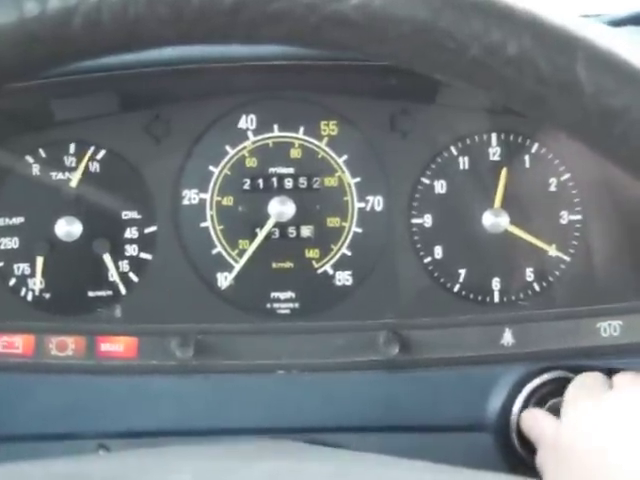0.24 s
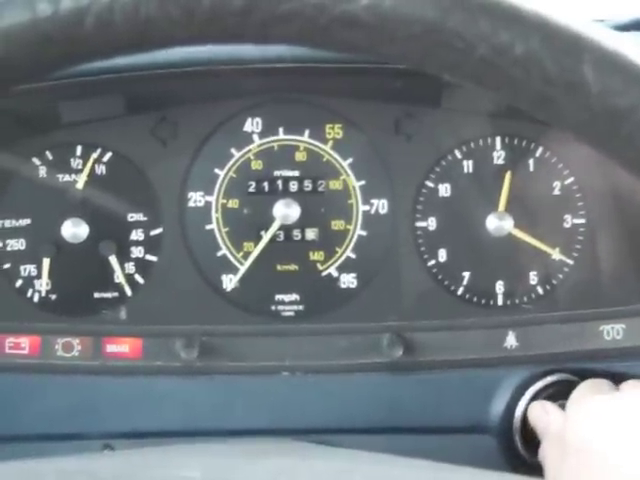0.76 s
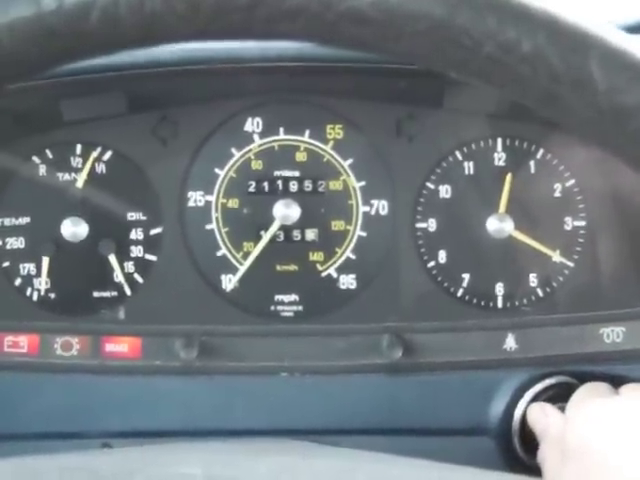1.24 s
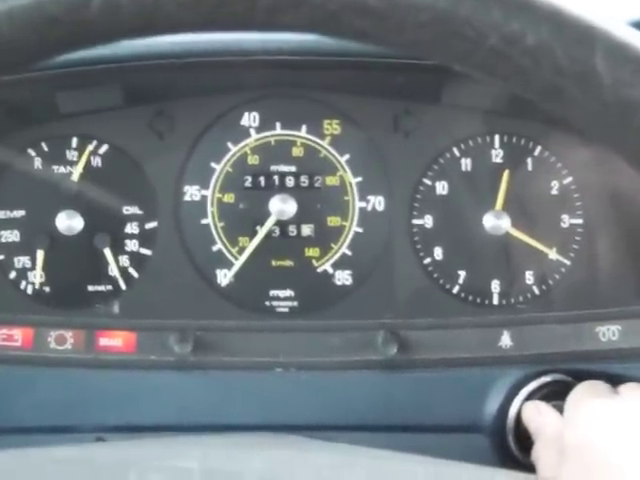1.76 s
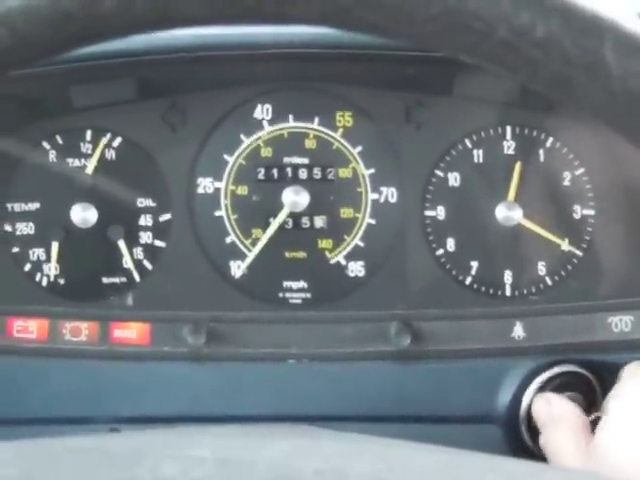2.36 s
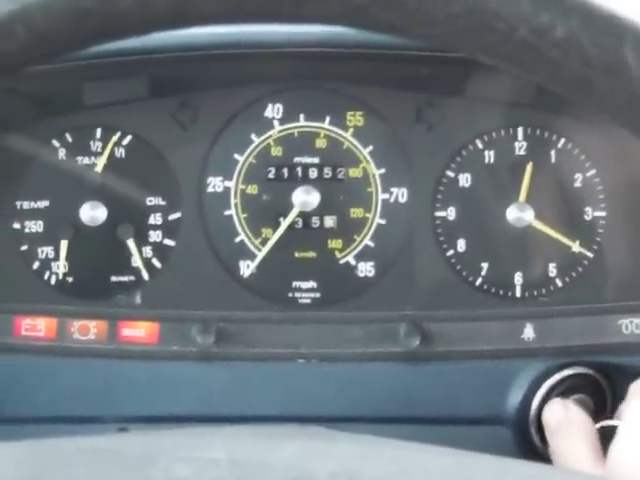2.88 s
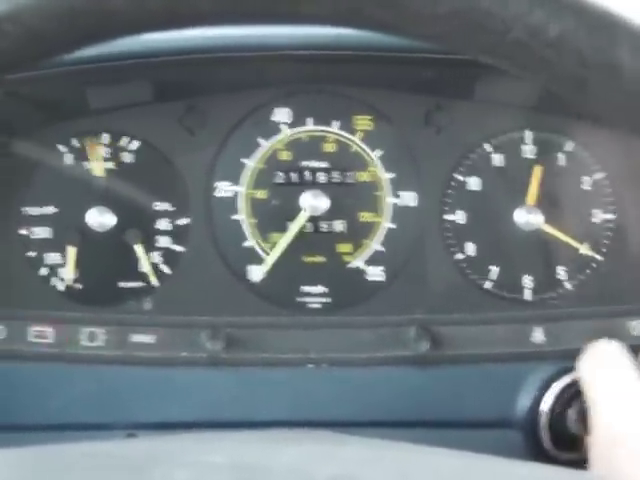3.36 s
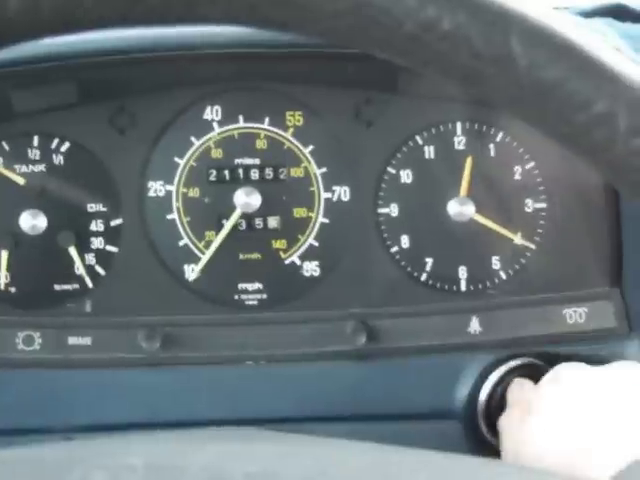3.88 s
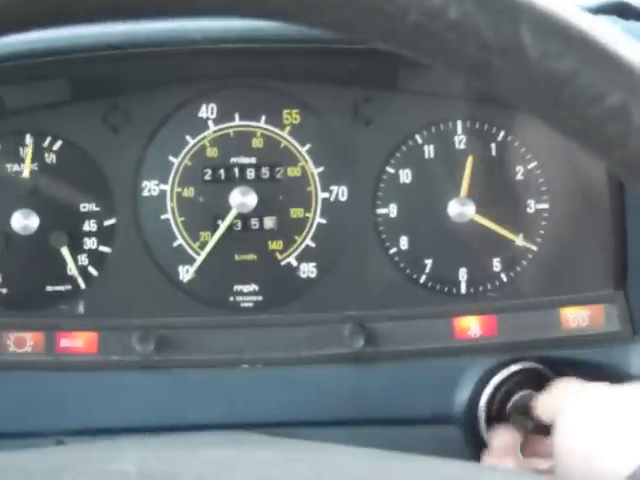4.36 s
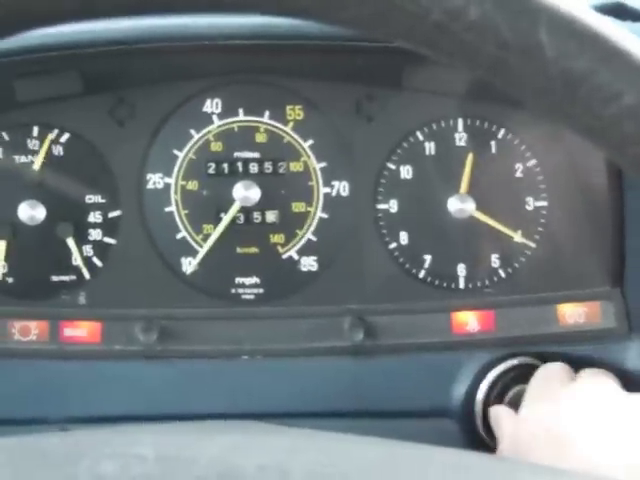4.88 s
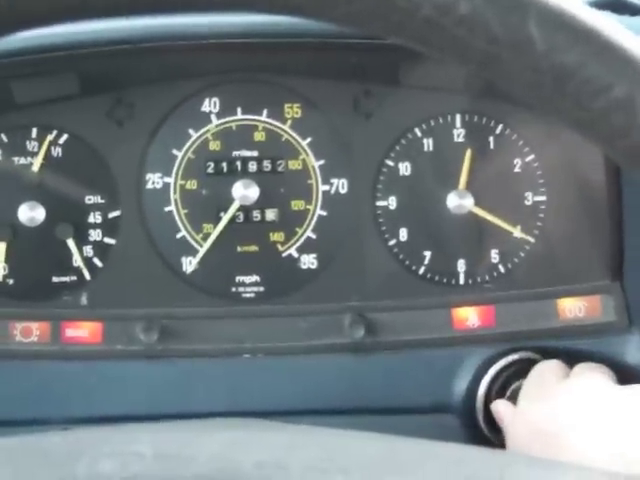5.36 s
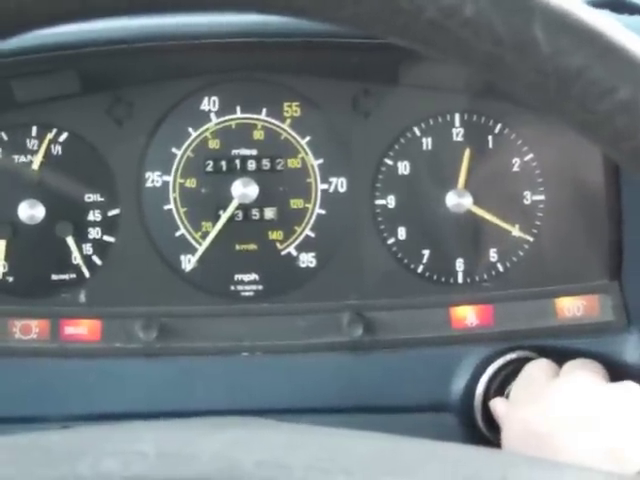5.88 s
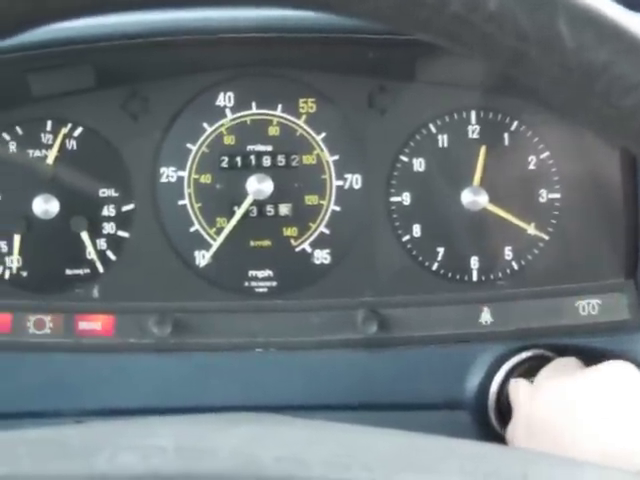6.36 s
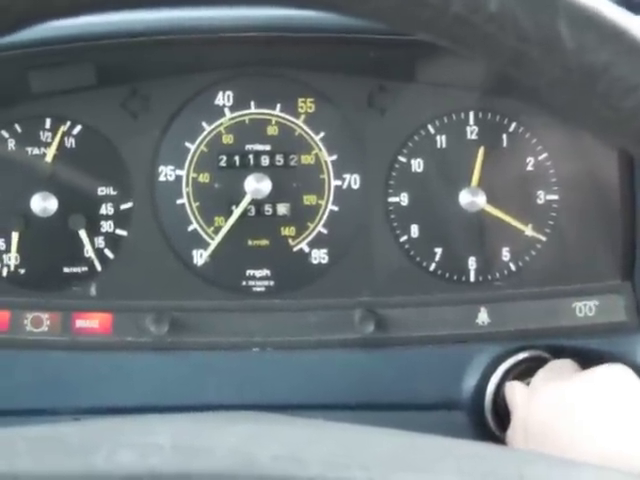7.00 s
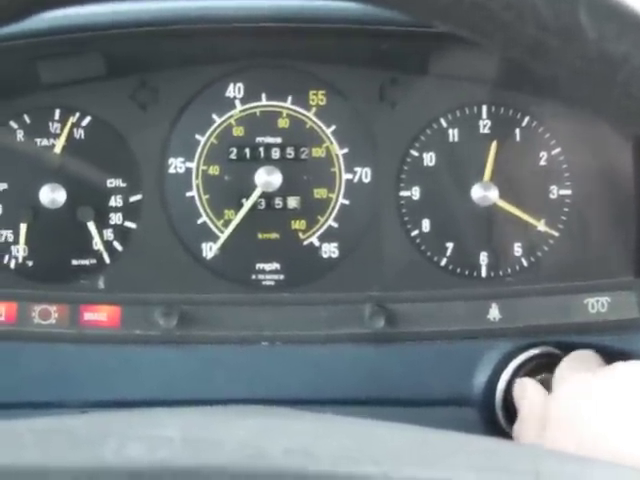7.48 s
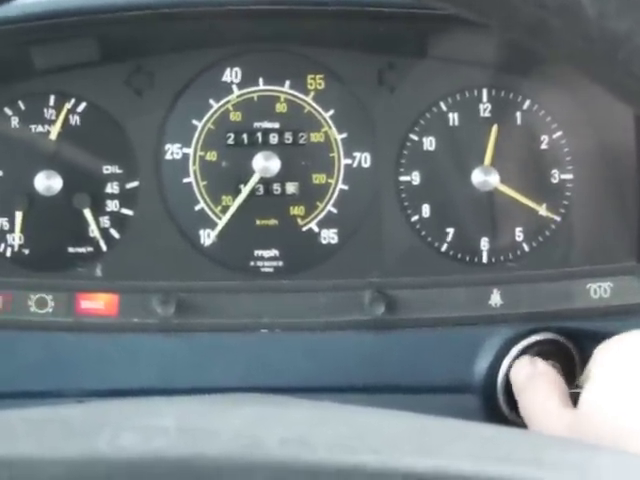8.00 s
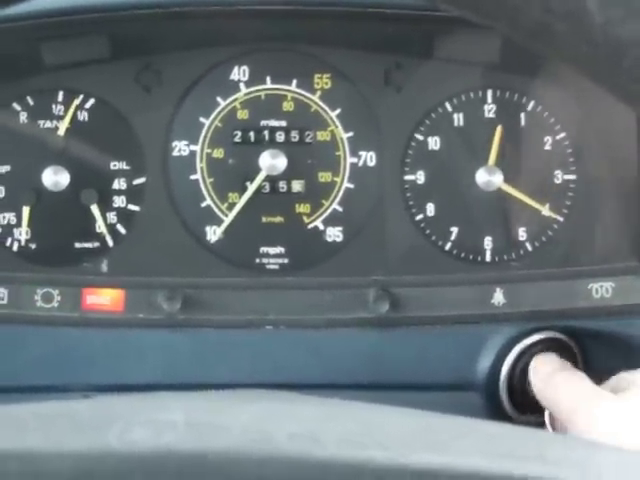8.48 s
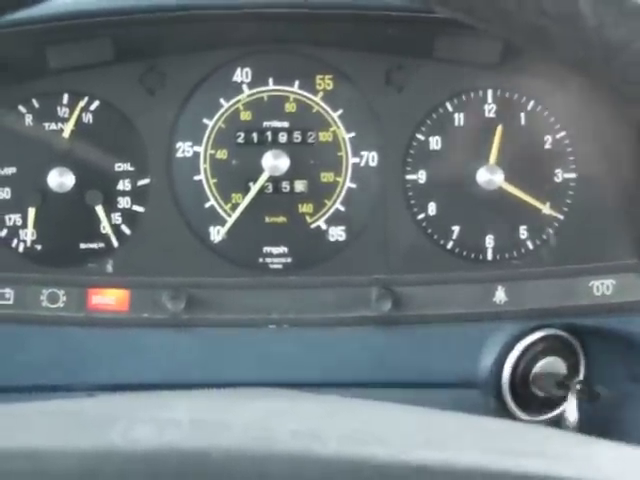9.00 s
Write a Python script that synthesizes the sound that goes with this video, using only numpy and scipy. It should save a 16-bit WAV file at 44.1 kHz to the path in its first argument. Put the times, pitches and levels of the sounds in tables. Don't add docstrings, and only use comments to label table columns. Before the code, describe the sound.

A cold diesel car cranks in heavy lurching thumps, stumbles and dies; key clicks follow, then a second crank catches and settles into idle.

```python
import sys
import numpy as np
from scipy import signal
from scipy.fft import rfft, irfft, next_fast_len
from scipy.io import wavfile
from scipy.ndimage import uniform_filter1d, map_coordinates

SR = 44100
rng = np.random.default_rng(int(sys.argv[2]) if len(sys.argv) > 2 else 0)


def elevation(decibels):
    levels = np.asarray(decibels, float)
    return 10 ** (levels / 20)


def persist_wave(psi):
    counts = np.round(np.clip(psi, -1, 1) * 32767).astype(np.int16)
    wavfile.write(sys.argv[1], SR, np.atleast_2d(counts).T)


N = 407484
TIME = np.arange(N) / SR

# [t/s, knock peak level/dB]
FIRST_CRANK = [(0.354, -22), (0.584, -44), (0.757, -23), (0.894, -17), (1.01, -18.5), (1.105, -20),
               (1.209, -18.5), (1.313, -17.5), (1.414, -18), (1.504, -24), (1.585, -19), (1.675, -16.5),
               (1.769, -18.5), (1.849, -22.5), (1.919, -18), (1.996, -18.5), (2.074, -19.5), (2.15, -21),
               (2.225, -34), (2.3, -29), (2.377, -32), (2.455, -43), (2.545, -53), (2.65, -47),
               (2.748, -56)]
# [t/s, knock peak level/dB]
SECOND_CRANK = [(6.211, -19), (6.434, -50), (6.623, -20.5), (6.76, -19.5), (6.88, -19.5), (6.972, -18.5),
                (7.072, -20), (7.165, -19), (7.253, -21.5), (7.338, -23), (7.401, -18.5), (7.474, -25.5),
                (7.547, -38), (7.606, -21.5), (7.666, -25.5)]
# [t/s, firing rate/Hz, load level/dB]
RUNNING = [(7.669, 17, -58), (7.851, 20.6, -77), (7.99, 29.8, -41.5), (8.11, 38.4, -41),
           (8.271, 47.3, -36.5), (8.357, 52.2, -37.5), (8.469, 46.4, -38.5), (8.62, 31.5, -44.5),
           (8.73, 30, -47.5), (8.82, 27.2, -45), (9.24, 27.2, -43.5)]
# [f/Hz, width/Hz, level/dB]
PANELS = [(48.7, 23.6, 4.5), (86.2, 24.7, 3), (117.5, 16.6, -2.5), (171.4, 15.2, -7.5)]
# [f/Hz, width/Hz, level/dB]
BULKHEAD = [(610, 120, -3), (1063, 155, 11.5), (1375, 23, 9), (1530, 52, 12), (787, 63, -0.5),
            (970, 17, 5.5)]
# [t/s, level/dB]
WHIRR = [
    [(0.33, -30), (0.5, -36), (.62, -34), (1.97, -27.5), (2.27, -27.5), (2.65, -44)],
    [(6.19, -29), (6.35, -37.5), (6.48, -34), (7.16, -30), (7.6, -27), (7.88, -33), (9.24, -35.5)],
]


def unit(x):
    return x / np.sqrt(np.mean(x ** 2) + 1e-20)


def steady(x, span_s):
    span = int(span_s * SR)
    power = uniform_filter1d(uniform_filter1d(x ** 2, span), span)
    return x / np.sqrt(np.abs(power) + 1e-3 * np.mean(x ** 2))


def levels(*tables):
    rows = []
    for table in tables:
        silent = [-99] * (len(table[0]) - 1)
        rows += [(table[0][0] - .01, *silent), *table, (table[-1][0] + .03, *silent)]
    rows = np.array(rows)
    return [elevation(np.interp(TIME, rows[:, 0], column)) for column in rows.T[1:]]


def held(spans, fade_s):
    return sum(elevation(np.interp(TIME, [a - .02, a, b, b + fade_s, b + fade_s + .02], [-99, 0, 0, -30, -99]))
               for a, b in spans)


def wobble(rate):
    return map_coordinates(rng.standard_normal(int(N * rate / SR) + 4), [TIME * rate])


def noise():
    return rng.standard_normal(N)


def filtered(x, response):
    m = next_fast_len(N + SR)
    hz = np.fft.rfftfreq(m, 1 / SR) + 1e-3
    return irfft(rfft(x, m) * response(hz), m)[:N]


def colour(points):
    f, db = np.transpose(points)
    return lambda hz: elevation(np.interp(np.log(hz), np.log(f), db))


def ringing(modes):
    return lambda f: sum((-1) ** k * elevation(db) * 1j * f * w / (c * c - f * f + 1j * f * w)
                         for k, (c, w, db) in enumerate(modes))


def band(x, lo_hz, hi_hz, order=2):
    edges = [lo_hz, min(hi_hz, SR / 2.1)]
    return signal.sosfilt(signal.butter(order, edges, "band", fs=SR, output="sos"), x)


def spikes(times, sizes):
    at = np.clip((np.asarray(times) * SR).astype(int), 0, N - 1)
    return np.bincount(at, sizes, N)


def bursts(x, rise_s, t60_s):
    t = np.arange(SR // 3) / SR
    swell = (1 - np.exp(-t / rise_s)) * elevation(-60 * t / t60_s)
    return np.abs(signal.fftconvolve(x, swell)[:N])


def firing_turns():
    s, rate = np.transpose(RUNNING)[:2]
    return np.cumsum(np.interp(TIME, s, rate) * (TIME > SECOND_CRANK[-1][0])) / SR


def strokes():
    first = TIME[1:][np.diff(np.floor(firing_turns())) > 0][:5]
    return np.vstack([FIRST_CRANK, SECOND_CRANK, np.c_[first, -26 - 2 * np.arange(5)]]).T


def cabin():
    # [f/Hz, level per Hz/dB]
    quiet = [(12, 1), (28, -5), (40, -16), (48, 6.5), (57, 0.5), (68, 6.5), (90, -16.5), (125, -3.5),
             (200, -21.5), (400, -23), (1000, -31), (3000, -34.5), (9000, -38.5), (16000, -45.5)]
    # [f/Hz, level/dB]
    whistle = [(15272, -82)]
    rumble = elevation(-44 + 0.35 * wobble(3.84)) * unit(filtered(noise(), colour(quiet)))
    return rumble + sum(1.7 * elevation(db) * np.sin(2 * np.pi * hz * TIME) for hz, db in whistle)


def clock():
    # [f/Hz, width/Hz, level/dB]
    case = [(950, 200, -4), (1650, 25, 5), (2330, 39, 5), (3090, 57, 6), (4450, 110, 3), (4900, 28, 3),
            (5300, 59, -10)]
    # [t/s, level/dB]
    ticks = [(.83, -46.5), (2.83, -51.5), (3.83, -49), (4.828, -47.5), (5.829, -48.5), (8.829, -51)]
    s, db = np.transpose(ticks)
    run = signal.fftconvolve(spikes(s - .016, elevation(db)), np.hanning(int(.15 * SR)) ** 0.65)[:N]
    ends = spikes(np.r_[s + .011, s + .066], elevation(np.r_[db, db] - 3.0))
    run = run + bursts(ends, 0.0014, 0.061)
    teeth = noise() * elevation(2.2 * wobble(90) + 4 * np.cos(2 * np.pi * 72 * TIME))
    damped = [(hz, width + 480, gain) for hz, width, gain in case]
    return run * unit(filtered(teeth, ringing(damped)))


def rustle(times):
    # [t/s, rustle level/dB]
    hand_moves = [(0, -51.5), (.31, -68), (.8, -94), (.98, -51.5), (1.13, -72), (2.3, -61), (2.6, -51.5),
                  (3.01, -63.5), (3.65, -55), (4.05, -50.5), (4.21, -84), (4.4, -50), (4.55, -50),
                  (4.97, -64.5), (5.3, -75.5), (8, -62.5), (8.36, -56), (9.24, -49)]
    # [t/s, thud level/dB, scuff level/dB]
    shifts = [(2.6, -46, -64), (3.33, -39.5, -74), (3.74, -45, -62), (4.08, -36, -42), (5.05, -53, -64),
              (5.17, -52, -64), (5.61, -39, -73), (6.17, -59, -54)]
    seated = [(2.7, 5.23)]
    sleeve, = levels(hand_moves)
    trim = elevation(-50) * (levels(*WHIRR)[0] / elevation(-29.5)) ** 2.57
    dull = trim + elevation(-2.0) * sleeve
    bright = elevation(-8.5) * trim + sleeve

    def swell(s):
        return np.clip(1 - np.abs(TIME - s) / 0.12, 0, 1) ** 2

    scuff = elevation(-62) * held(seated, 0.35) + sum(elevation(db) * swell(s) for s, _, db in shifts)
    thud = elevation(-55.5) * held(seated, .3) + sum(elevation(db) * swell(s) for s, db, _ in shifts)
    jolt = 1 + 0.64 * bursts(spikes(times, np.ones(len(times))), 0.0064, 0.17)
    cloth = dull * jolt * unit(band(noise(), 1640, 6780, order=4))
    cloth = cloth + bright * jolt ** .5 * unit(band(noise(), 8300, 13700))
    patchy = elevation(-3.5 + 1.55 * wobble(25) + 1.96 * wobble(200))
    hand = elevation(4.6 * wobble(30)) * scuff * unit(band(noise(), 580, 2640))
    return patchy * cloth + hand + elevation(-2.0) * thud * unit(band(noise(), 94, 282))


def creak():
    # [t/s, peak level/dB]
    jerks = [(5.383, -43.5), (5.423, -49), (5.493, -41), (5.527, -40.5), (5.566, -36.5), (5.584, -37),
             (5.598, -38), (5.611, -37), (5.623, -36.5), (5.637, -37), (5.657, -38)]
    # [f/Hz, width/Hz, level/dB]
    vinyl = [(300, 43, 6), (790, 80, -2), (1250, 300, -12), (1650, 140, -6), (2240, 170, -7),
             (3100, 2300, -14)]
    # [f/Hz, width/Hz, level/dB]
    cushion = [(140, 45, 4.5), (290, 90, 0), (430, 90, -6)]
    s, db = np.transpose(jerks)
    slips = spikes(s, elevation(db + 16))
    squeak = filtered(bursts(slips, 0.0011, 0.043) * noise(), ringing(vinyl))
    thump = band(filtered(slips, ringing(cushion)), 90, 480)
    return band(squeak, 680, 13000) + elevation(25.5) * thump


def chatter():
    # [t/s, length/s, level/dB]
    buzzes = [(.53, .05, -56), (.72, .015, -54), (7.54, .03, -48), (3.023, 0.033, -50.5), (3.228, .02, -51),
              (5.02, 0.19, -56), (8.842, 0.035, -57), (8.95, 0.056, -49), (8.047, .02, -61),
              (8.256, 0.039, -44.5), (8.356, .06, -43.5), (8.455, 0.024, -41.5), (8.615, 0.013, -50),
              (8.792, 0.013, -65)]
    gate = 0
    for s, length, db in buzzes:
        corners = [s - .003, s, s + length, s + length + 0.022]
        gate = gate + elevation(db + np.interp(TIME, corners, [-60, -1.5, -0.5, -42], -99, -99))
    trim = ringing([(3900, 120, 4), (2250, 200, 4), (1750, 150, 4)])
    grit = band(noise() * elevation(2.2 * wobble(300)), 1160, 4900)
    return gate * unit(filtered(grit, lambda f: 1 + trim(f)))


def bumps():
    # [t/s, start
    # f/Hz, end f/Hz, length/s, level/dB]
    scrapes = [(3.296, 777, 700, 0.017, -25), (3.328, 104, 99, 0.069, -33), (2.486, 1000, 970, 0.017, -37),
               (2.735, 30, 28, 0.053, -28), (3.095, 1390, 1200, 0.0097, -42), (3.706, 520, 560, 0.02, -44),
               (3.724, 560, 600, 0.018, -41), (3.739, 620, 700, 0.012, -41), (3.741, 1500, 1600, 0.01, -45),
               (3.757, 700, 650, .012, -40), (3.955, 650, 850, 0.04, -45), (3.932, 1700, 1650, .01, -40),
               (4.06, 720, 680, .016, -32), (4.617, 1000, 980, .02, -46), (4.06, 174.5, 155, 0.12, -40),
               (4.0866, 2700, 2300, 0.004, -26), (4.09, 2400, 2500, 0.02, -34),
               (3.997, 1650, 1600, 0.013, -26.5), (4.001, 1000, 1000, 0.012, -28),
               (4.177, 2000, 1950, 0.013, -36), (4.537, 2800, 2700, 0.057, -45.5),
               (4.369, 960, 890, 0.021, -43.5), (4.58, 1500, 1400, 0.037, -50.5),
               (4.39, 200, 160, 0.044, -42), (4.729, 1180, 900, 0.016, -50.5), (5, 390, 326, 0.033, -43.5),
               (5.179, 1090, 1140, 0.023, -50)]
    # [t/s, f/Hz, t60/s, level/dB]
    springs = [(3.315, 2880, 0.39, -44), (2.065, 4200, 0.19, -39), (3.32, 6050, 0.17, -51),
               (4.12, 1100, 0.4, -45.5), (2.5, 4400, .3, -48), (5.1, 2200, 4.2, -61)]
    out = np.zeros(N + SR)
    for s, start_hz, end_hz, length, db in scrapes:
        u = np.arange(int(length * SR)) / (length * SR)
        turn = 2 * np.pi * length * (start_hz * u + (end_hz - start_hz) * u * u / 2)
        smear = .7 + .55 * np.interp(turn / 5, np.arange(130), rng.standard_normal(130))
        glide = 2 * elevation(db) * np.sin(np.pi * u ** 0.44) * smear * np.sin(turn)
        out[round(s * SR):][:len(u)] += glide
    t = TIME[:SR // 3]
    for s, hz, t60, db in springs:
        phase = 2 * np.pi * hz * t + 0.27 * t60 * wobble(90)[:SR // 3]
        out[round(s * SR):][:SR // 3] += elevation(db - 60 * t / t60) * np.sin(phase)
    return out[:N]


def clicks():
    # [t/s, peak level/dB]
    snaps = [(0.322, -27.5), (.3581, -32), (2.176, -27), (2.453, -36), (2.4897, -21.5), (3.076, -30.5),
             (3.093, -26.5), (3.245, -32), (3.254, -27.5), (3.284, -22.5), (3.2978, -20), (3.3015, -12.5),
             (2.625, -42), (3.618, -31), (3.757, -28), (3.9965, -17.5), (4.0489, -19.5), (4.176, -28),
             (4.545, -33), (4.619, -26.5), (4.6785, -37), (6.156, -32), (6.169, -24)]
    # [t/s, peak level/dB]
    knocks = [(1.884, -26), (3.049, -42), (3.486, -40.5), (3.934, -32.5), (4.02, -28), (4.0642, -23),
              (4.0861, -40), (4.366, -31), (4.4942, -42), (5.197, -43), (7.7344, -33), (8.487, -29),
              (4.0405, -31)]
    # [t/s, peak level/dB]
    jingles = [(4.4105, -39), (4.613, -40), (4.5415, -38), (4.575, -45), (1.402, -33), (2.0602, -26.5),
               (2.248, -23), (2.28, -24), (2.325, -25.5), (3.3244, -40), (3.379, -50), (3.034, -42),
               (3.712, -38), (3.81, -38), (4.563, -36), (4.667, -21.5), (7.7245, -20), (3.903, -42),
               (2.505, -36)]
    # [t/s, peak level/dB]
    rattles = [(0.2726, -38), (1., -34), (1.916, -27), (3.399, -38), (4.1179, -29), (4.4099, -47),
               (6.2007, -40), (7.614, -32.5), (7.9, -38), (7.944, -38.5), (7.985, -40.5)]
    # [t/s, peak level/dB]
    cracks = [(2.396, -21.5), (3.311, -11), (4.106, -19.5), (8.1722, -20), (4.192, -45)]
    # [low knock level/dB, brightness level/dB]
    kinds = [
        (1.5, -6),
        (6.5, -10),
        (-9, -4),
        (10.5, 4),
        (1.5, 5),
    ]
    # [f/Hz, width/Hz, level/dB]
    key_modes = [(3270, 2600, -3.5), (5030, 220, 10.5), (6000, 190, 2), (2480, 470, -2)]
    # [f/Hz, width/Hz, level/dB]
    ring_modes = [(6140, 34, 1.5), (8360, 180, 9), (11150, 48, -20)]
    contacts = []
    for rows, kind in zip([snaps, knocks, jingles, rattles, cracks], kinds):
        contacts += [(*row, *kind) for row in rows]
    s, db, low_db, high_db = np.transpose(contacts)

    def shape(sizes):
        hits = spikes(s, sizes)
        return bursts(hits, 0.0006, 0.042) + 0.19 * bursts(hits, 0.0061, 0.13)

    grit = elevation(2.26 * wobble(500))
    low = shape(elevation(db - 9.0 + np.minimum(low_db, 10))) * unit(band(noise(), 120.0, 1920))
    keys = filtered(band(noise(), 2400, 5430), lambda f: 0.73 + ringing(key_modes)(f))
    mid = shape(elevation(db - 9.0)) * unit(keys)
    fizz = band(noise() * elevation(2.4 * wobble(1500)), 5400, 13200)
    high = shape(elevation(db - 7.5 + high_db)) * unit(filtered(fizz, lambda f: 1 + ringing(ring_modes)(f)))
    tick = band(spikes(s + 0.00057, elevation(db + np.minimum(high_db, 0) - 3)), 2500, 15500)
    return low + grit * (mid + high) + tick


def whirr(times):
    # [f/Hz, level per Hz/dB]
    gears = [(120, -13), (200, 3.5), (729, -6.5), (845, -13.5), (1050, -9), (2030, -21), (5000, -30),
             (6500, -73), (11000, -120)]
    bed, = levels(*WHIRR)
    ring = elevation(-56.5) * held([(.33, 2.18), (6.19, 7.65)], 0.42)
    hum = filtered(noise() * elevation(2.5 * wobble(60)), colour(gears))
    hum = filtered(hum, lambda f: 4.1 + ringing(BULKHEAD)(f))

    def housing(hz):
        return unit(filtered(noise(), lambda f: ringing([(hz, 62, 0)])(f) ** 2))

    load = .3 + bursts(spikes(times, np.ones(len(times))), .008, .33)
    high = elevation(1.5 + 2.3 * wobble(25)) * housing(2270)
    settling_db = np.interp(TIME % 5.87, [.75, 1.1], [6.5, 5])
    low = elevation(settling_db + 2 * wobble(20)) * housing(1060)
    deep = elevation(6.5 + 2 * wobble(20)) * (bed / elevation(-31)) * housing(595)
    return bed * elevation(-5.0) * steady(load, 0.11) * unit(hum) + ring * (high + low + deep)


def starter():
    # [t/s, tooth rate f/Hz, level/dB]
    spin = [
        [(.345, 205, -38), (.42, 257.7, -31), (.47, 286, -39), (.56, 337.6, -38), (.592, 326, -31),
         (.625, 239.3, -32.5), (.65, 196.4, -33), (.665, 155, -36), (.7, 169, -42)],
        [(6.215, 290, -36.5), (6.29, 276.2, -34.5), (6.33, 308.2, -40), (6.39, 341, -38.5), (6.425, 322, -38.5),
         (6.455, 272.6, -35), (6.49, 224.7, -34.5), (6.52, 165, -33), (6.555, 165.5, -37)],
    ]
    # [f/Hz, width/Hz, level/dB]
    shell = [(294, 78, 2), (486, 41, 7.5), (590, 50, 1.5), (650, 45, 8), (1044, 59, 3)]
    loaded_s = (.61, 6.46)
    rows = np.vstack(spin)
    rate = np.interp(TIME, rows[:, 0], rows[:, 1]) * (1 + .028 * wobble(130))
    turn = 2 * np.pi * np.cumsum(rate) / SR
    second, = levels(*[np.delete(t, 1, axis=1) for t in spin])
    first = second * elevation(-4.0 - 9 * held([(s, s + .3) for s in loaded_s], .1))
    uneven_1 = 1 + .4 * wobble(70)
    uneven_2 = 1 + .42 * wobble(70)
    grind = unit(band(noise(), 400, 1750)) * (1 + np.cos(turn))
    strain = 1 + 0.6 * held([(s - .02, s + .06) for s in loaded_s], 0.058)
    upper = np.sin(3 * turn) + 0.66 * np.sin(4 * turn) + 0.45 * np.sin(5 * turn)
    mesh = 1.05 * uneven_2 * np.sin(2 * turn) + 0.36 * strain * grind + 0.34 * uneven_1 * upper
    teeth = first * uneven_1 * np.sin(turn) + second * mesh
    return elevation(-4) * filtered(teeth, lambda f: 1 + ringing(shell)(f))


def stumble(times):
    # [t/s, heave level/dB, extra lag/stroke periods]
    half_firings = [
        [(1.82, -32, .04), (1.98, -17, .04), (2.2, -17, .01), (2.39, -16, -.04), (2.47, -21, -.05),
         (2.56, -34, -.05)],
        [(7.27, -30, .04), (7.41, -17, .1), (7.6, -15, .14), (7.7, -13, .24), (7.79, -13, .26),
         (7.87, -24, .22)],
    ]
    # [first try level/dB, second try level/dB, first lag, second lag/stroke periods]
    heave_orders = [(0, 0, .17, .17), (-1.5, -13, .26, .26), (-6, -6, .44, .35), (-7, -18, .25, .25),
                    (-10, -16, .29, .2)]
    heave, = levels(*[np.delete(t, 2, axis=1) for t in half_firings])
    rows = np.vstack(half_firings)
    count = np.interp(TIME, times, np.arange(len(times))) - np.interp(TIME, rows[:, 0], rows[:, 2])
    first_try = TIME < 5
    orders = 0
    for k, (one_db, two_db, one_lag, two_lag) in enumerate(heave_orders):
        lag = np.where(first_try, one_lag, two_lag)
        swing = np.cos(2 * np.pi * (k + 1) * (count - lag))
        orders = orders + elevation(np.where(first_try, one_db, two_db)) * swing
    blows = spikes(times + .022, np.ones(len(times))) * heave * elevation(52.5 - 7 * (TIME > 5))
    thumps = filtered(blows, ringing([(122, 30, 0), (165, 40, 0)]))
    return np.sqrt(2) * heave * orders + thumps, np.clip(heave / elevation(-22), 0, 1)


def sways(times):
    # [t/s, level/dB]
    rocking = [
        [(.3, -58), (.39, -34.5), (.68, -47.5), (.9, -28.5), (1.75, -24), (1.95, -18.5), (2.38, -17),
         (2.55, -31), (2.95, -46)],
        [(6.15, -60), (6.26, -37.5), (6.57, -48.5), (6.75, -28), (7.18, -27), (7.45, -17.5), (7.74, -19),
         (7.97, -28)],
    ]
    # [level/dB, t60 after a stroke/s, lag/s, swing exponent]
    parts = [
        (3.5, 1.6, 0.072, 0.96),
        (-2.5, 0.94, 0.0021, 1.36),
        (0, 0.6, 0, 1.13),
    ]
    rock, = levels(*rocking)
    beats = spikes(times, np.ones(len(times)))
    out = []
    for db, t60, lag, swing in parts:
        sag = steady(0.23 + bursts(beats, 0.029, t60), 0.18)
        sway = rock * (rock / elevation(-33.5)) ** (swing - 1) * sag
        out.append(elevation(db) * np.interp(TIME - lag, TIME, sway))
    return out


def body(times):
    shake, boom, drum = sways(times)
    chance = rng.standard_normal((len(times), 2))
    kicks = spikes(times + 0.01118, elevation(3.0 * chance[:, 0]))
    rebounds = spikes(times + 0.03032 + 0.0033 * chance[:, 1], -.6 * elevation(5.7 * chance[:, 1]))
    push = unit(kicks + rebounds)
    rough = np.interp(TIME, [0, 1.6, 2, 7, 7.5], [.6, .5, .3, .5, .3])
    rattle = bursts(kicks, 0.036, 0.53)
    panels = filtered(push + rough * unit(noise() * steady(rattle, 0.13)), ringing(PANELS))
    low = steady(band(unit(kicks) + 0.68 * noise(), 6.8, 25.5, order=3), 0.025)
    air = steady(band(panels, 41.4, 65.2), 0.079)
    skins = steady(band(panels, 59.3, 214, order=3), 0.069)
    heave, set_in = stumble(times)
    return heave + (1 - .75 * set_in) * (shake * low + boom * air) + (1 - .3 * set_in) * drum * skins


def knock(times, db):
    # [f/Hz, level per Hz/dB]
    block = [(120, 17.5), (200, 0), (423, -9), (591, -14), (839, -2.5), (1060, -2.5), (2050, -20.5),
             (2290, -9), (2480, -20), (3460, -12), (7300, -26), (7900, -40), (19800, -120)]
    hits = spikes(times - .005, elevation(db + 1.2))
    grain = unit(filtered(steady(noise() * elevation(3 * wobble(250)), .012), colour(block)))
    raps = spikes(times + .002, elevation(db - 2.5))
    raps = raps + spikes(times + .008 + .006 * rng.random(len(times)), elevation(db))
    clatter = bursts(hits, 0.004, .115) * grain + 4.5 * band(raps, 700, 1770, order=3)
    clatter = filtered(clatter, lambda f: 1 + ringing(BULKHEAD)(f))
    grumble = bursts(hits, 0.016, 0.22) * unit(band(noise(), 185, 695))
    return elevation(-1.0) * clatter + elevation(-10) * grumble


def running():
    # [level at the usual load/dB, gain per dB of load/dB]
    orders_heard = [(-27.5, 1.5), (-37.5, 1.94)]
    # [f/Hz, level/dB]
    cabin_air = [(20, -2), (40, -0.5), (60, -2.5), (85, 2), (105, -7.5), (160, -1)]
    # [t/s, first order level/dB, its lead/firing periods, rocking twice a turn/dB, shaft turn/dB]
    low_boom = [(7.9, -27, .52, -32, -45), (8.04, -20, .4, -27, -42), (8.16, -24, .3, -22, -25),
                (8.25, -34, .05, -19, -22), (8.34, -23, -.28, -20, -23), (8.43, -18.5, -.23, -20, -24),
                (8.55, -31, -.25, -22, -27), (8.66, -24, -.28, -27, -33), (8.8, -27, -.2, -30, -45),
                (8.93, -21, -.08, -24, -45), (9.02, -21.5, -.08, -29, -43), (9.12, -19, -.08, -25, -48),
                (9.24, -20, -.08, -36, -46)]
    # [f/Hz, width/Hz, level/dB, delay/firing periods]
    valves = [(390, 200, -4.5, 0.325), (746, 150, -11, 0.36), (1054, 74, -4.5, -0.05),
              (1527, 56, -9.5, 0.03), (1310, 500, -13.5, 0.2)]
    # [t/s, level/dB]
    panel_buzz = [
        (7.95, -27),
        (8.312, -30.5),
        (8.656, -35.5),
        (9.24, -34.5),
    ]
    clatter, = levels(np.delete(RUNNING, 1, axis=1))
    turns = firing_turns()
    load = clatter / elevation(-43)
    orders = [elevation(db) * load ** grows * (clatter > 1e-4) for db, grows in orders_heard]
    lead = np.interp(TIME, [7.92, 8.14, 8.66, 8.8], [-.55, 0, 0, -.5])
    orders[0] = orders[0] * np.exp(2j * np.pi * lead)
    orders[1] = orders[1] - elevation(-25) * held([(7.9, 8.06)], .2)
    boom = 0
    for k, gain in enumerate(orders):
        loose = 1.5 * elevation(1.5 * wobble(14))
        phase = 2 * np.pi * (k + 2) * (turns - .3) + .2 * wobble(9)
        boom = boom - loose * np.real(gain * np.exp(1j * phase))

    first, rocking, turning = levels(np.delete(low_boom, 2, axis=1))
    lead = np.interp(TIME, *np.transpose(low_boom)[[0, 2]])
    shaft = first * np.cos(2 * np.pi * (turns + lead))
    shaft = shaft + rocking * np.cos(2 * np.pi * (turns * 4 / 5 + .5))
    shaft = np.sqrt(2) * (shaft + turning * np.cos(2 * np.pi * (turns * 2 / 5 + .65)))

    beat = turns - np.interp(8.972, TIME, turns)
    hardest = (np.floor(beat + .5) % 5 == 0) * (TIME > 8.7)
    taps = 0
    for hz, width, db, delay in valves:
        lower = 600 < hz < 900
        extra_db = 7 * (hz > 1300) + 3 * (900 < hz < 1300)
        firing = np.diff(np.floor(beat - delay), prepend=99).clip(0)
        blow = firing * elevation(1.1 * wobble(40) + hardest * extra_db)
        strike = (8 + 22 * lower) * blow + (bursts(blow, .001, .06) + 9e-2) * noise()
        forward = elevation(np.interp(TIME, [8.55, 8.75], [-4, 9.5]) * lower)
        skirts = lambda f: (f / hz).clip(0, 1) * (hz / f).clip(0, 1)
        struck = filtered(strike, lambda f: ringing([(hz, width, 0)])(f) * skirts(f))
        taps = taps + forward * elevation(db) * unit(struck)

    buzz, = levels(panel_buzz)
    drum = filtered(noise() * elevation(2.0 * np.cos(2 * np.pi * turns)), ringing(PANELS))
    drum = elevation(3.5) * buzz * unit(band(drum, 113, 390))
    return filtered(boom, colour(cabin_air)) + shaft + clatter * 0.6 * taps + drum


def scene():
    times, db = strokes()
    background = cabin() + clock()
    driver = rustle(times) + creak() + chatter() + bumps() + clicks()
    engine = whirr(times) + starter() + body(times) + knock(times, db) + running()
    return (background + driver + engine)[None]


def low_pass(x):
    return signal.sosfilt(signal.butter(12, 16500, fs=SR, output="sos"), x)


def record(dry):
    rounded = dry / (1 + np.abs(dry / .7) ** 5) ** (1 / 5)
    limit = lambda hz: np.interp(hz, [15750, 16000, 16500, 16510], [1, .04, .02, 0])
    mix = filtered(rounded[0], limit)[None]
    return low_pass(mix)


dry = scene()
out = record(dry)
persist_wave(out)
```